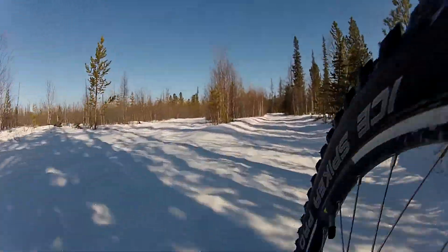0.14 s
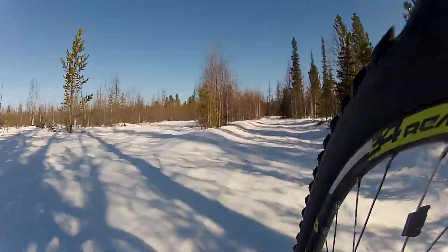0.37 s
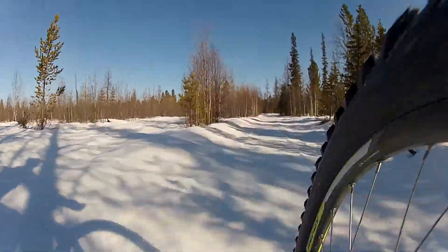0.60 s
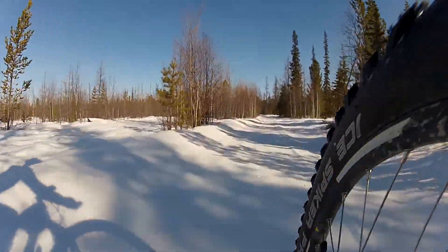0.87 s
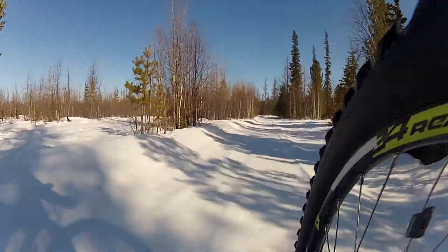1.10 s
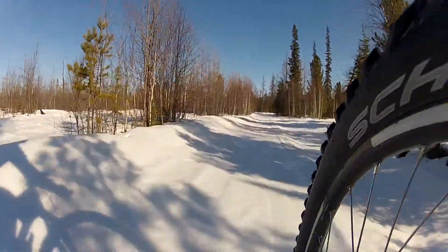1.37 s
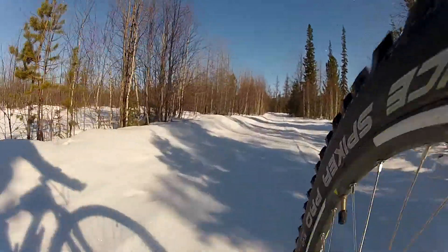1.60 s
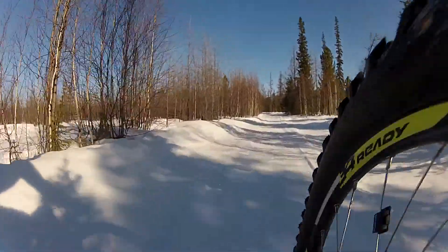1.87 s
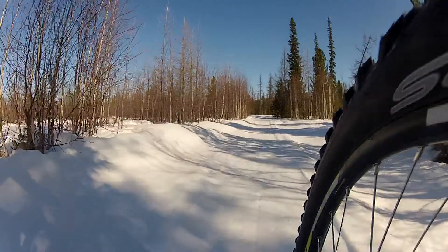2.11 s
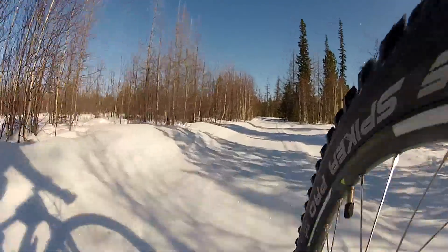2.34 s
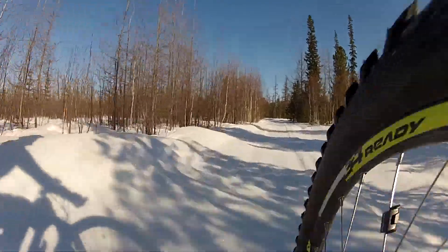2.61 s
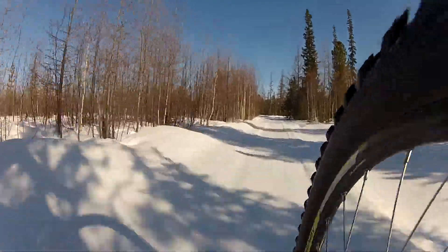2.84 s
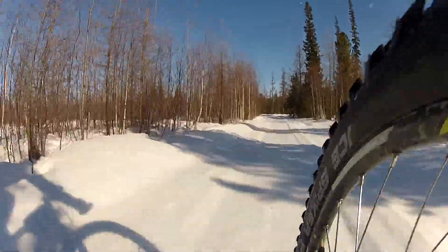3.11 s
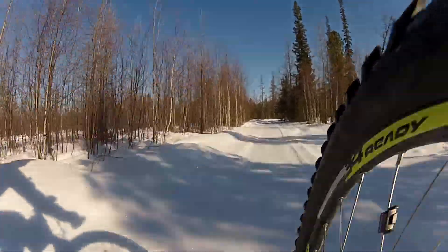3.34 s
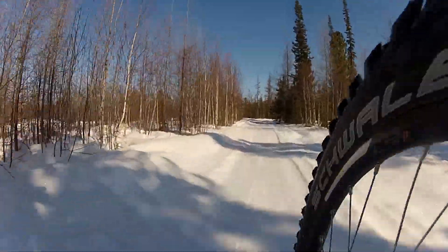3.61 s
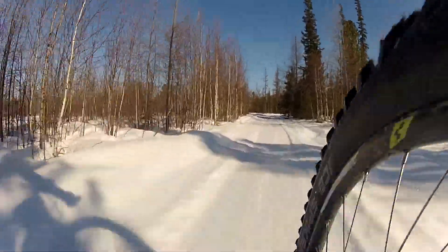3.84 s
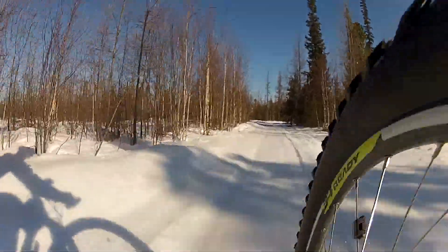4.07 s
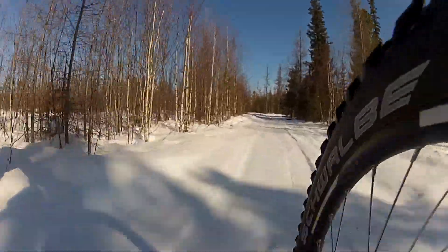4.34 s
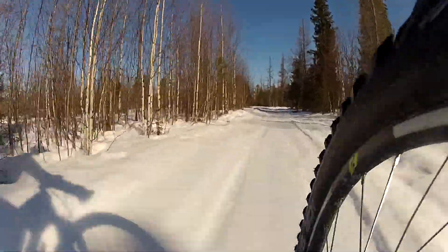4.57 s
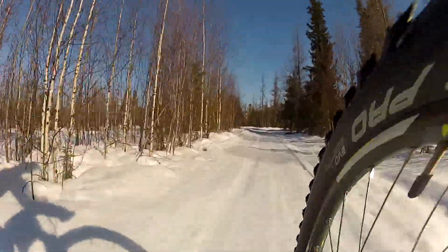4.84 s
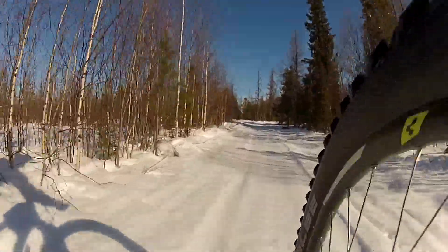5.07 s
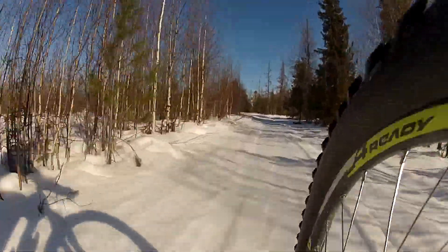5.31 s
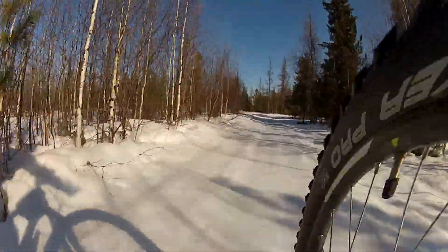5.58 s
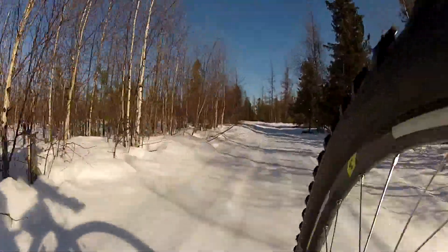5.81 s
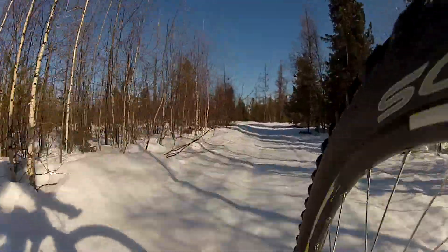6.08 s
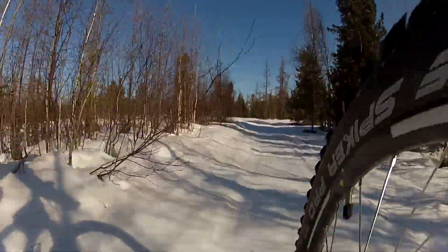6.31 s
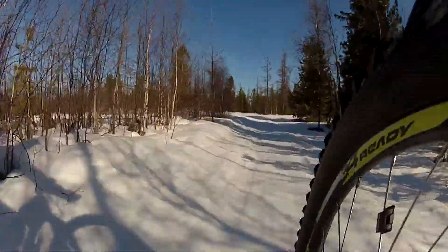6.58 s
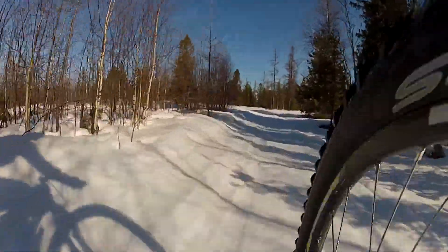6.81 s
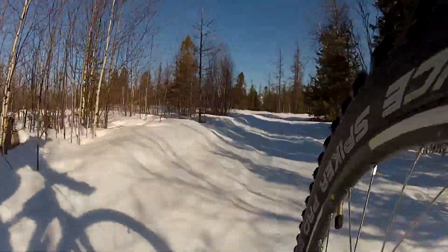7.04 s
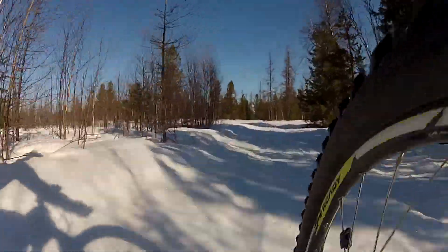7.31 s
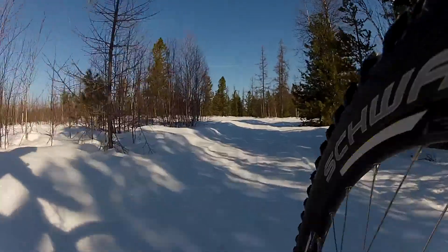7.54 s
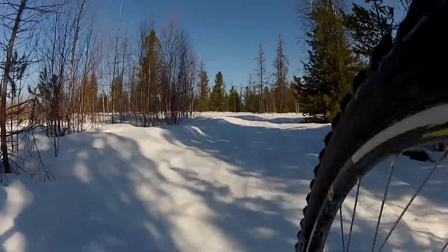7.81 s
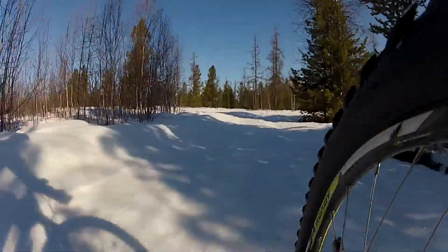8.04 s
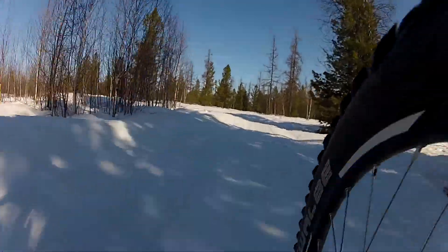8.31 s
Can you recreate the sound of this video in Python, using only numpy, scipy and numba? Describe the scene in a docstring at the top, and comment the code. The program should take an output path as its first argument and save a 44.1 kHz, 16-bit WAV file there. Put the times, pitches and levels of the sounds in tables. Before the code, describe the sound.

Close, rough sound from a small camera mounted on a bicycle fork. A loose part clatters dry and hollow inside its plastic case, many times a second and unevenly, over grainy tyre crunch on packed snow and low hums from bumps. Big bumps past six seconds bring a deep rumble and the hardest knock, then the rattling resumes nearly to the end. Loud peaks distort and the level ducks.

```python
"""A small camera clamped to a bicycle fork rolls over packed snow, for about eight seconds.
The tyre's crunch starts loud and thins at once; a loose part begins knocking and rings the plastic case.
Bumps swell the fork's hum and the clamp's throb throughout; the crunch of the snow is faintest near 4.8 s.
Big bumps at 6.3 to 6.5 s lead to the hardest knock at 6.6 s, then knocking goes on almost to the end.
The recorder turns down after loud peaks, creeps back, clips hard peaks and holds each slow sample."""
import sys
import numpy as np
from scipy import signal
from scipy.fft import next_fast_len
from scipy.io import wavfile
from scipy.ndimage import uniform_filter1d
from numba import njit

SR = 44100
rng = np.random.default_rng(int(sys.argv[2]) if len(sys.argv) > 2 else 0)


def volts(x):
    """Linear amplitude factor 10**(x/20) for a level x in dB, scalar or array-like."""
    e = np.asarray(x, float) / 20
    return 10 ** e


def generate_wav(sig):
    """Save sig (samples, or channels by samples) to the path in sys.argv[1] as 16-bit PCM at SR."""
    pcm = np.round(np.clip(np.atleast_2d(sig).T, -1, 1) * 32767).astype(np.int16)
    wavfile.write(sys.argv[1], SR, pcm)


N = 371322  # length in samples
CONTACT_S = 7.5e-5  # usual width of a blow's force pulse

# knocks of the loose part: start_s, blow_db (over the usual blow), contact_ratio (times the usual contact)
LOOSE_PART_KNOCKS = [(.0151, 0.5, 0.62), (0.0632, 6, 1.8), (0.097, 9, 1.1), (0.1975, 6.5, 1.1),
                     (0.3148, 18, 0.69), (0.3528, 5.5, 0.96), (0.3992, 17, 0.93), (0.4362, 1.5, 0.65),
                     (0.4778, 8, 0.67), (0.5217, 12.5, 0.96), (0.5652, 6, 0.7), (0.664, 3.3, 1.23),
                     (0.8983, 13.5, 1.3), (0.9466, 8, 0.74), (0.9757, 13.5, 1), (1.0178, 8.5, 0.59),
                     (1.0598, 7.5, 1.04), (1.1941, 22, 1.28), (1.2399, 18, 0.88), (1.3185, 1.5, 0.7),
                     (1.3973, 13, 1.3), (1.4531, 15, 0.99), (1.5425, 6, 0.61), (1.5842, 10, 0.83),
                     (1.6272, 4, 0.53), (1.6696, 16.5, 0.87), (1.8214, 5, 1.8), (1.9094, 3.5, 0.76),
                     (2.0915, 17, 1.44), (2.139, 13, 0.9), (2.1795, 1, 0.7), (2.2206, 15, 1.22),
                     (2.355, 2.5, 0.9), (2.4396, 12.5, 1.36), (2.4848, 0.5, 0.6), (2.6829, 14, 0.56),
                     (2.7244, 1, 0.98), (2.7896, -2, 0.78), (2.816, 3.5, 0.81), (3.0683, 17, 0.81),
                     (3.2874, 0.5, 1.2), (3.4812, 21.5, 0.96), (3.523, 13, 0.83), (3.561, 4, 1.03),
                     (3.6112, 13.5, 0.67), (3.702, 12, 0.68), (3.79, 10, 0.58), (3.837, 15, 1.23),
                     (3.8824, 13.5, 0.64), (3.929, 5, 1.9), (3.9774, 16.5, 1.27), (4.0206, 14, 1.1),
                     (4.0597, 11, 0.83), (4.1328, 9.5, 1.2), (4.1432, 1, 1.1), (4.1825, 14.5, 1.04),
                     (4.2219, 6, 0.83), (4.3335, 7, 1.05), (4.4589, 5.5, 1), (4.5177, 14.5, 0.8),
                     (4.5578, -6, 0.78), (4.593, -8, 1.1), (4.6189, 24, 0.84), (4.671, 5.5, 1.14),
                     (4.709, 4, 0.89), (4.7517, 0, 1.07), (4.8006, 19.5, 0.93), (4.8444, 6, 1.1),
                     (4.8883, 3.5, 0.71), (4.9337, 3, 0.78), (4.9754, 2, 0.87), (5.005, 9.5, 0.83),
                     (5.0457, 10, 0.59), (5.092, -3, 0.7), (5.141, 16.5, 1.18), (5.178, 2.5, 0.47),
                     (5.2214, 10, 1.03), (5.4734, 16, 1.2), (5.5119, 5, 0.82), (5.5567, 11, 0.83),
                     (5.596, 10.5, 0.9), (5.6911, 12, 0.66), (5.772, 8, 0.88), (5.857, 6, 0.79),
                     (5.9074, 3, 1), (5.948, 3.5, 0.71), (6.07, 8.5, 2.05), (6.1124, 3, 1.16),
                     (6.5769, 28, 0.82), (6.8154, 14, 0.86), (6.8627, 15.5, 0.73), (6.8957, 11.5, 0.94),
                     (7.1358, 21, 1.36), (7.3187, 11.5, 1.18), (7.55, 5, 1.34), (7.5875, 14, 0.93),
                     (7.6284, 14, 1.1), (7.707, 12, 0.67), (7.7467, 10.5, 0.72), (7.7746, 6, 0.72),
                     (7.869, 19, 1.3), (7.9044, 2.5, 0.62), (7.9424, 10.5, 0.77), (7.993, 15, 0.97),
                     (8.04, 14, 0.88), (8.0758, 13.5, 0.75), (8.1221, 3.5, 0.62), (8.167, 1.5, 0.68),
                     (8.212, 8.5, 0.68), (8.2564, 2, 1.1), (8.296, -3, 0.9), (8.3769, 2.5, 0.38)]


def knocks(usual_blow_db=6, spot_db=2.5, thin_hz=600, graze_db=-16, lead_s=0.000806):
    """The loose part never hits quite the same spot, so each knock weights the case modes anew."""
    start_s, blow_db, contact_ratio = np.transpose(LOOSE_PART_KNOCKS)
    chance = rng.standard_normal((len(start_s), 2 + len(CASE_MODES)))
    size = volts(blow_db + usual_blow_db)
    length_s = CONTACT_S * np.clip(contact_ratio, 0.4, 2.5)
    mode_db = spot_db * chance[:, 2:]
    ring = case(start_s, size, length_s, mode_db)
    # one corner grazes the wall a moment before the full blow
    graze_s = start_s - lead_s * np.exp(0.403 * chance[:, 0])
    graze_size = size * volts(graze_db + 2.2 * chance[:, 1])
    ring = ring + case(graze_s, graze_size, 0.46 * length_s, mode_db)
    # the part is too light to move the bass
    low_pass = signal.butter(N=3, Wn=thin_hz, fs=SR, output="sos")
    return ring - signal.sosfiltfilt(low_pass, ring)


# ringing modes of the plastic case: pitch_hz, level_db, t60_s (time to fade by 60 dB),
# side (+1 or -1, side of the node line)
CASE_MODES = [(693.4, -10.5, 0.037, 1), (999, -23.5, 0.036, -1), (1107, -28, 0.049, 1),
              (1554, -7, 0.017, 1), (1748, -5.5, 0.016, -1), (1761, -7.5, 0.015, -1),
              (1991, -5.5, 0.015, 1), (2230, -12.5, 0.025, -1), (2595, -17.5, 0.032, -1),
              (2893, -9.5, 0.013, 1), (3380, -15, 0.02, 1), (3770, -17, 0.017, 1), (5600, -32, 0.027, 1)]


def case(start_s, size, length_s, mode_db):
    """Force pulses ring decaying modes; those on opposite sides of their node lines partly cancel at first."""
    out = 0
    for (pitch_hz, level_db, t60_s, side), struck_db in zip(CASE_MODES, mode_db.T):
        pole = np.exp(2j * np.pi * pitch_hz / SR - np.log(1000) / (t60_s * SR))
        force = pushes(start_s, size * volts(struck_db), length_s)
        ring = signal.lfilter([0, pole.imag], [1, -2 * pole.real, abs(pole) ** 2], force)
        out = out + side * volts(level_db) * ring
    return out


def pushes(start_s, size, length_s):
    """Bell-shaped force pulses: equal sizes carry equal momentum, however long the contact."""
    at = (start_s * SR).astype(int)[:, None] + np.arange(-24, 25)
    bell = np.exp(-0.5 * ((at / SR - start_s[:, None]) / length_s[:, None]) ** 2)
    bell *= (size / bell.sum(axis=1))[:, None]
    return np.bincount(np.clip(at, 0, N - 1).ravel(), bell.ravel(), minlength=N)


# resonances of the fine-grain hiss: pitch_hz, width_hz, level_db
GRAIN_HISS = [(3710, 150, -22.5), (690, 162, -6.5), (873, 160, -9), (1350, 900, -8), (3040, 74, -43),
              (4540, 900, -32), (5450, 250, -31), (1570, 320, -4)]


def crunch(per_s=1500, scatter_db=3.5, spread_db=6.5, studs_db=-11):
    """Snow grains break under the tyre knobs; the jolts travel up the fork into the case from all sides."""
    chance = rng.standard_normal((int(per_s * N / SR), 2 + len(CASE_MODES)))
    start_s = rng.random(len(chance)) * N / SR
    direction = np.sign(chance[:, 1])
    size = volts(scatter_db * np.clip(chance[:, 0], -2, 2)) * direction
    length_s = np.full(len(start_s), 0.99 * CONTACT_S)
    ring = case(start_s, size, length_s, spread_db * chance[:, 2:])
    # finer grains merge into a hiss
    hiss = sum(narrow_resonances(rng.standard_normal(N), [peak]) for peak in GRAIN_HISS)
    return unit(unit(ring) + hiss + volts(studs_db) * studs())


# rows of tyre studs passing over the ground: start_s, rows_per_s
STUD_ROW_RATE = [(0, 82), (.8, 82), (1.4, 79.5), (2.2, 82), (2.8, 81), (3.4, 85), (3.8, 81), (4.4, 84),
                 (5.3, 82), (5.95, 83.4), (6.25, 81.6), (6.55, 80.8), (7.3, 86), (7.8, 81), (8.42, 83)]
# pinging of the studs: pitch_hz, width_hz, level_db
STUD_RESONANCES = [(3620, 380, -3.5), (2786, 180, -13)]


def studs(bite_s=0.0011, scatter_db=2.5):
    """Each row of tyre studs bites the hard snow with a short scratch that pings."""
    start_s, rows_per_s = np.transpose(STUD_ROW_RATE)
    rate = np.interp(np.arange(N) / SR, start_s, rows_per_s)
    rows = np.cumsum(rate) / SR
    size = volts(scatter_db * rng.standard_normal(N // 100))[rows.astype(int)]
    from_bite_s = (rows % 1 - 0.5) / rate
    scratch = size * np.exp(-0.5 * (from_bite_s / bite_s) ** 2) * rng.standard_normal(N)
    return narrow_resonances(scratch, STUD_RESONANCES)


# how coarse the snow is under the tyre: start_s, level_db (of the crunch in the case)
SNOW_COARSENESS = [(0, -5), (.13, -20), (.22, -16), (.75, -16), (1.0, -14.5), (1.3, -17.5), (1.6, -12.5),
                   (1.72, -16), (2.1, -11), (2.5, -16), (2.8, -17), (3.05, -11.5), (3.3, -16), (3.65, -11),
                   (4.05, -17), (4.75, -24.5), (5.2, -19), (5.45, -17), (5.8, -18.5), (6.15, -14),
                   (6.7, -16.5), (7.45, -13.5), (7.6, -13), (8.2, -19.5), (8.42, -13.5)]


def snow_gain(t):
    """Coarser snow crunches louder; the level glides in dB from point to point."""
    return volts(np.interp(t, *np.transpose(SNOW_COARSENESS)))


# bumps in the trail: start_s, held_s, fork_db (hum), clamp_db (throb)
TRAIL_BUMPS = [(.06, 0.057, -6.5, -5.5), (.18, 0.011, -19, -10), (.28, 0.013, -7, -17),
               (.38, .01, -22, -11.5), (.57, 0.08, -14.5, -17), (.86, 0.087, -11, -12.5),
               (1.229, .01, -7, -9.5), (1.36, 0.011, -14.5, -11.5), (1.52, 0.077, -7, -10.5),
               (1.81, 0.026, -8.5, -25), (1.99, 0.15, -6, -11.5), (2.27, 0.013, -13, -7.5),
               (2.47, 0.08, -21, -11), (2.6, 0.12, -15.5, -14.5), (2.77, 0.045, -11, -25),
               (2.94, 0.069, -10, -17), (3.11, 0.098, -5.5, -32), (3.43, 0.034, -5, -5),
               (3.55, 0.16, -8, -26), (3.85, .02, -6, -9), (3.939, .03, -0.5, -9), (4.16, 0.009, -7, -13),
               (4.3, .03, -8, -11.5), (4.45, 0.013, -13.5, -12.5), (4.56, 0.08, -6.5, -9),
               (4.82, 0.0059, -7, -8.5), (5.01, 0.0092, -9, -10.5), (5.29, 0.16, -4.5, -17.5),
               (5.68, .01, -15, -10.5), (5.83, 0.038, -5.5, -11.5), (5.97, .19, -9, -11.5),
               (6.33, 0.15, 0, 2), (6.5, 0.037, -2, 2.5), (6.68, .09, -7, -9.5), (6.83, .01, -4, -10.5),
               (7.0, 0.015, -16, -10.5), (7.1, 0.0061, -33, -8.5), (7.28, 0.011, -11, -15),
               (7.48, .1, -5, -11.5), (7.66, .01, -14, -5.5), (7.87, .01, -7.5, -12),
               (7.96, 0.012, -14, -5), (8.01, 0.027, -3, -12.5), (8.23, 0.058, -7, -13)]


def bumps(t, rise_db_per_s=196, fall_db_per_s=122):
    """Each bump swells, holds and dies away; returns the gains of fork and clamp."""
    start_s, held_s, fork_db, clamp_db = np.transpose(TRAIL_BUMPS)[:, :, None]
    rise_db = -rise_db_per_s * np.maximum(start_s - t, 0)
    fall_db = -fall_db_per_s * np.maximum(t - start_s - held_s, 0)
    shape_db = rise_db + fall_db
    return [np.sqrt(np.sum(volts(db + shape_db) ** 2, axis=0)) for db in (fork_db, clamp_db)]


# resonance of the fork: pitch_hz, width_hz, level_db
FORK_RESONANCE = [(75, 14, 0)]


def fork_hum():
    """Random jolts make the fork hum at its narrow resonance, with part of the random swell taken out."""
    return steadied(narrow_resonances(rng.standard_normal(N), FORK_RESONANCE), share=0.75)


# resonances of the clamp: pitch_hz, width_hz, level_db
CLAMP_RESONANCES = [(163.3, 81, -4.5), (238.2, 37, -2), (270, 26.5, -3), (30.6, 18, -23)]


def clamp_throb():
    """Random jolts make the clamp throb at its resonances, kept below 320 Hz."""
    throb = resonances(rng.standard_normal(N), CLAMP_RESONANCES)
    low_pass = signal.cheby1(6, 1, 320, fs=SR, output="sos")
    return unit(signal.sosfilt(low_pass, throb))


def unit(x):
    """Scale to rms 1."""
    return x / np.sqrt(np.mean(x ** 2))


def resonances(x, peaks):
    """Sum of two-pole resonances, each at its own rms level."""
    out = 0
    for pitch_hz, width_hz, level_db in peaks:
        b, a = signal.iirpeak(pitch_hz, pitch_hz / width_hz, SR)
        out = out + volts(level_db) * unit(signal.lfilter(b, a, x))
    return out


def narrow_resonances(x, peaks):
    """Each resonance applied twice, which keeps the valleys between them dark."""
    return sum(resonances(resonances(x, [peak]), [peak]) for peak in peaks)


def steadied(x, share):
    """Take part of the random swell out of a narrow ring."""
    envelope = np.abs(signal.hilbert(x, next_fast_len(N))[:N])
    swell = uniform_filter1d(envelope, size=1200)
    return unit(x / (swell + 0.05) ** share)


def scene(bump_crunch_db=-5.5, fork_idle_db=-2.5, clamp_idle_db=1.5):
    """Everything reaches the microphone through the case."""
    t = np.arange(0, N + 64, 64) / SR
    snow = snow_gain(t)
    hum, throb = bumps(t)
    # a bump presses the tyre harder: its crunch is set relative to the throb
    crunch_level = np.hypot(snow, volts(bump_crunch_db) * throb)
    # between bumps the coarse snow alone keeps fork and clamp going
    fork_level = np.hypot(hum, volts(fork_idle_db) * snow)
    clamp_level = np.hypot(throb, volts(clamp_idle_db) * snow)
    levels = (crunch_level, fork_level, clamp_level)
    crunch_gain, fork_gain, clamp_gain = (np.interp(np.arange(N) / SR, t, level) for level in levels)
    mix = knocks() + crunch_gain * crunch() + fork_gain * fork_hum() + clamp_gain * clamp_throb()
    return mix[None]


@njit
def gain_control(x, gain, top, full, attack, hold, release):
    """The gain falls at a fixed dB rate while recent peaks are over the top, then creeps back toward full."""
    y, peak = np.empty(len(x)), 0.
    for i in range(len(x)):
        y[i] = x[i] * gain
        peak = max(min(abs(y[i]), 1.), peak * hold)
        if peak > top:
            gain *= attack
        else:
            gain += release * (full - gain)
    return y


def clipped(x, knee=1.6):
    """Rounds off loud peaks toward full scale; a larger knee clips harder."""
    return np.tanh(np.abs(x) ** knee) ** (1 / knee) * np.sign(x)


def slow_converter(x, slow_edge_hz=12300, treble_edge_hz=15400):
    """Samples at 12 kHz, each held for four ticks of 48 kHz: treble folds down and mirror images appear."""
    soft = signal.sosfiltfilt(signal.butter(N=6, Wn=slow_edge_hz, fs=SR, output="sos"), x)
    slow = signal.resample_poly(soft, 160, 147)[::4]
    held = signal.resample_poly(np.repeat(slow, 4), 147, 160)[:N]
    return signal.sosfiltfilt(signal.butter(N=10, Wn=treble_edge_hz, fs=SR, output="sos"), held)


def roll_off(x):
    """The treble ends steeply here."""
    return signal.sosfilt(signal.butter(12, 16470, fs=SR, output="sos"), x)


def record(dry, top_db=-2.5, full_db=6.5, attack_db_per_ms=6, peak_hold_s=0.0015, release_s=0.79):
    """The recorder controls the gain, clips, then passes the sound through its slow converter."""
    attack = volts(-1000 * attack_db_per_ms / SR)  # gain factor per sample
    hold = np.exp(-1 / (peak_hold_s * SR))
    release = 1 / (release_s * SR)
    loud = gain_control(dry[0], 0.27, volts(top_db), volts(full_db), attack, hold, release)
    held = slow_converter(clipped(loud))
    mix = np.clip(held, -1, 1)[None]
    return roll_off(mix)


dry = scene()
out = record(dry)
generate_wav(out)
```